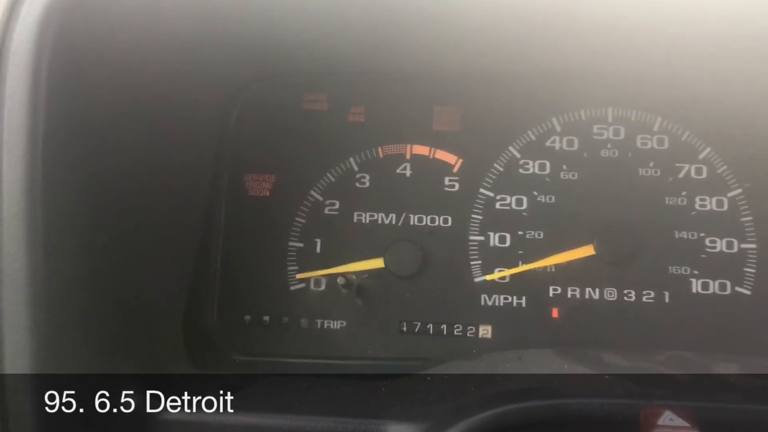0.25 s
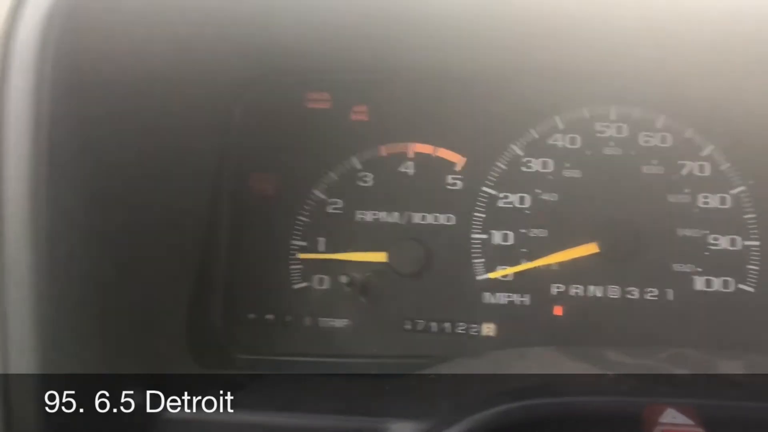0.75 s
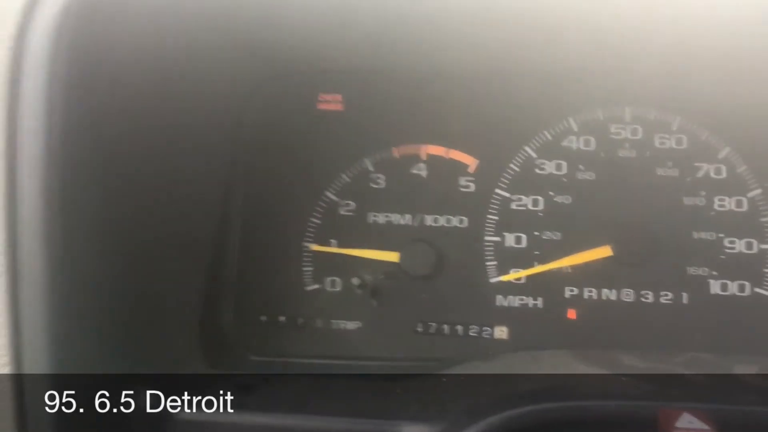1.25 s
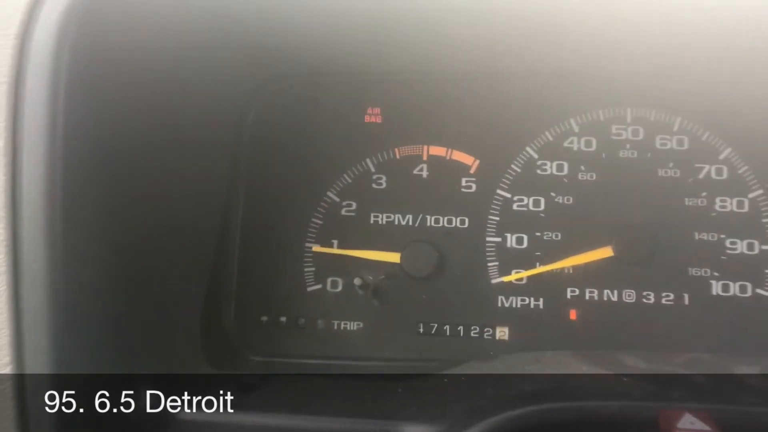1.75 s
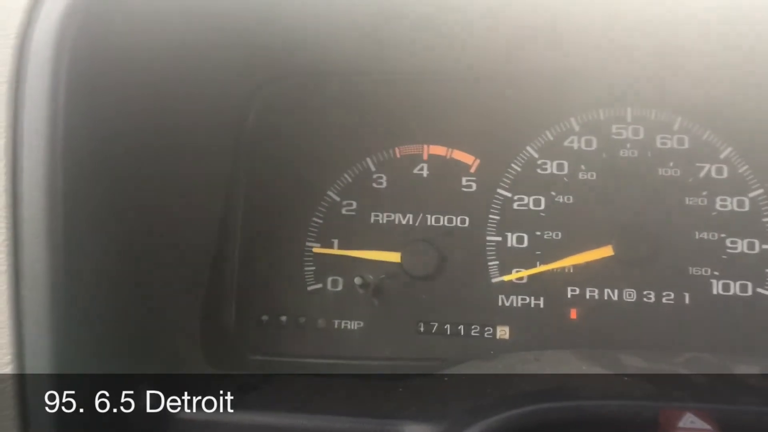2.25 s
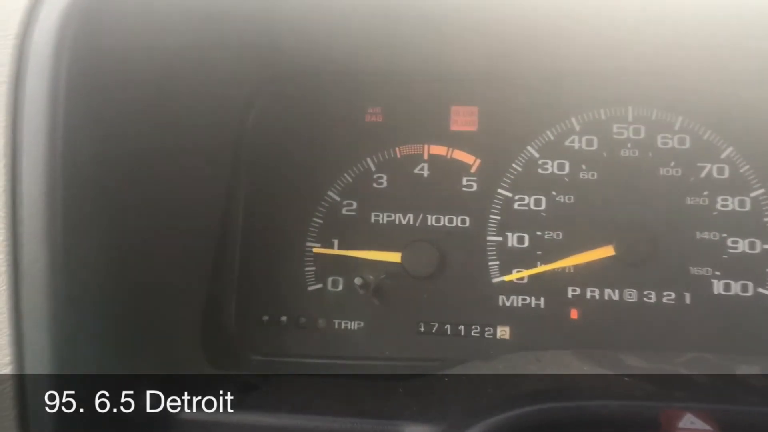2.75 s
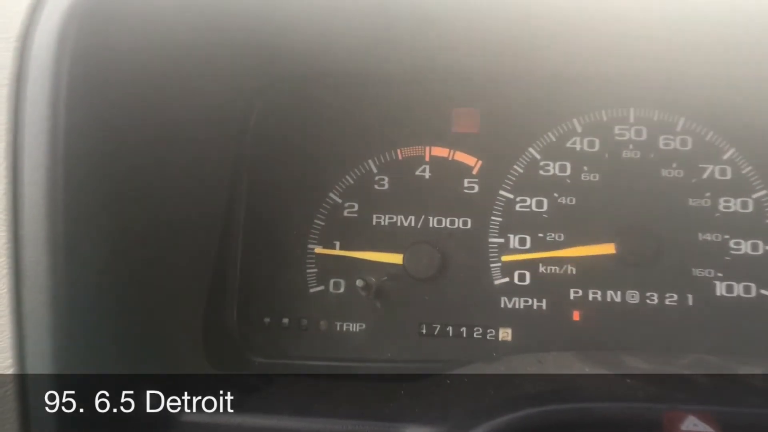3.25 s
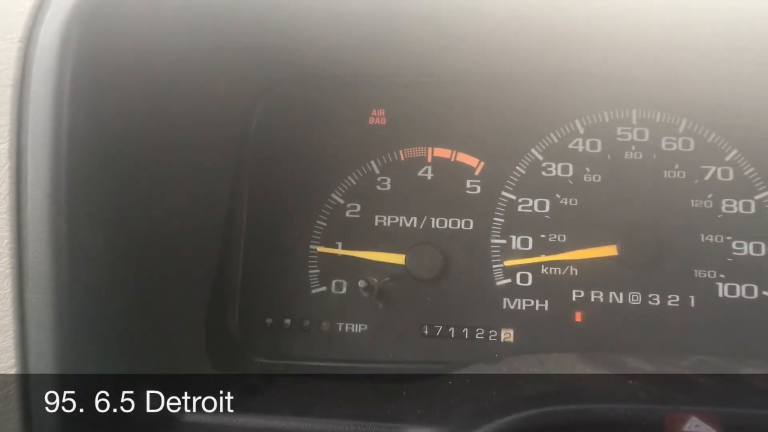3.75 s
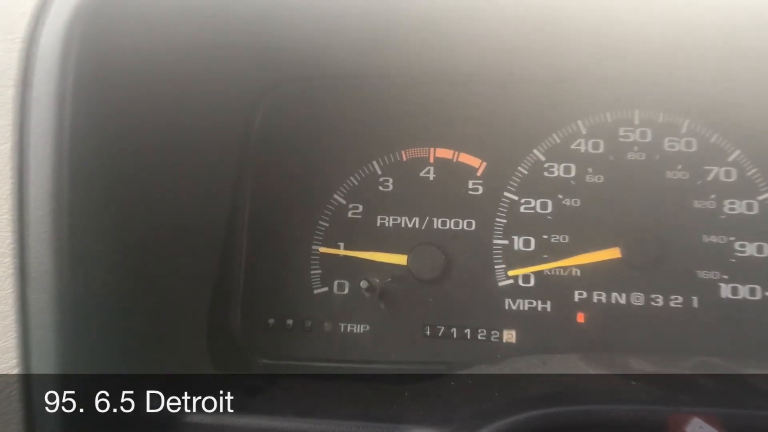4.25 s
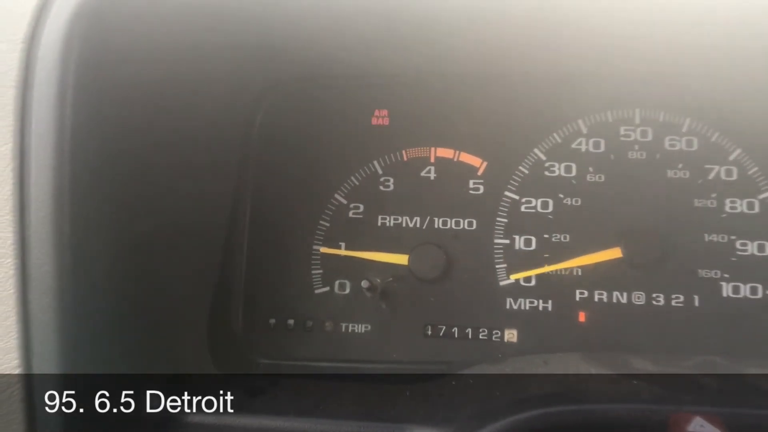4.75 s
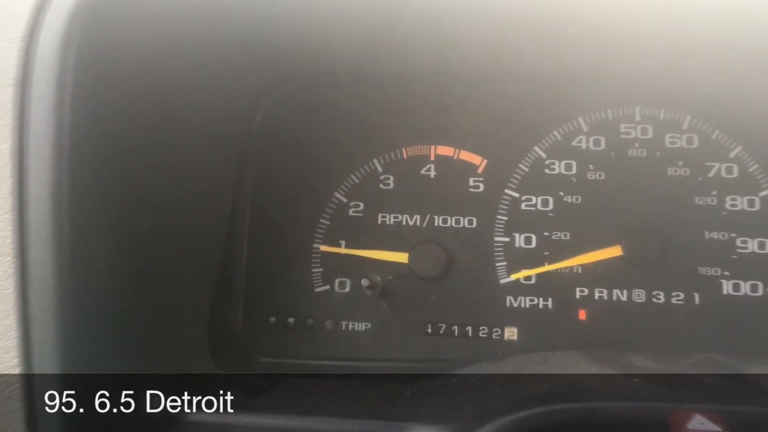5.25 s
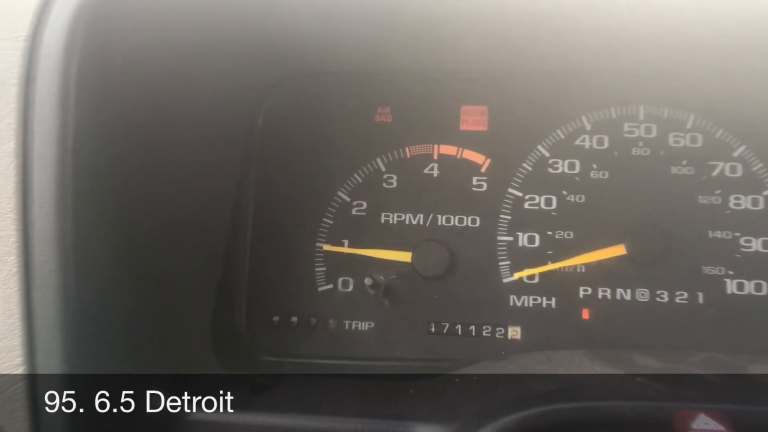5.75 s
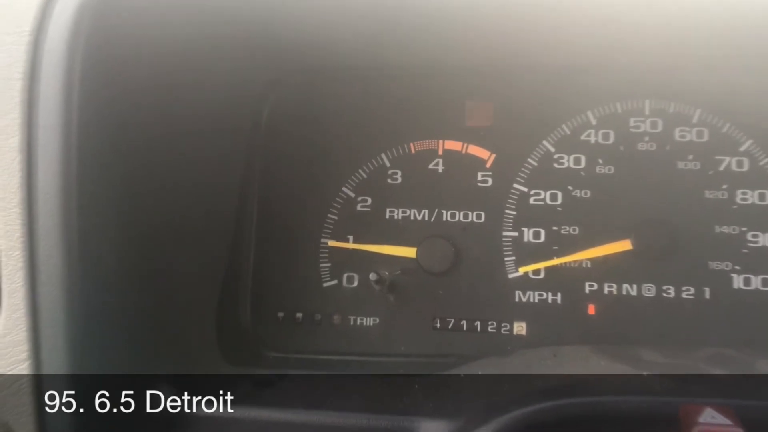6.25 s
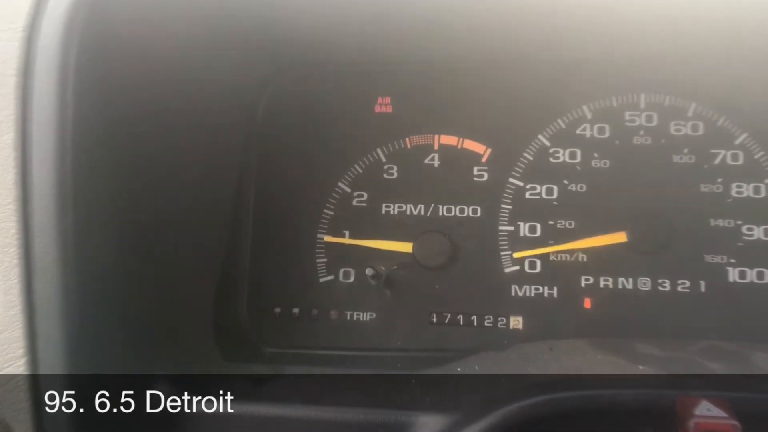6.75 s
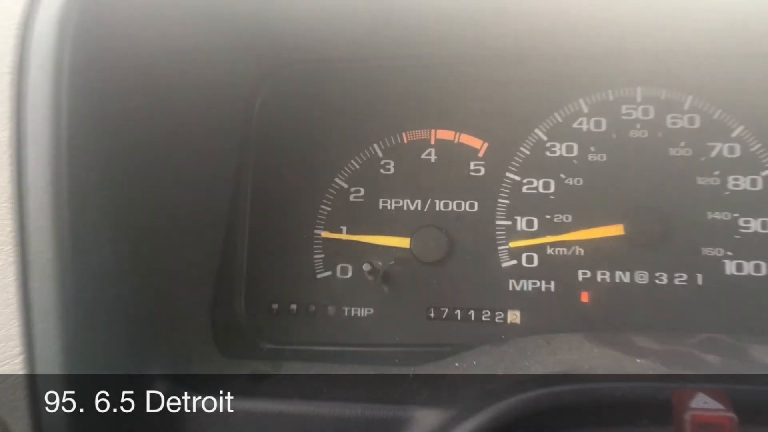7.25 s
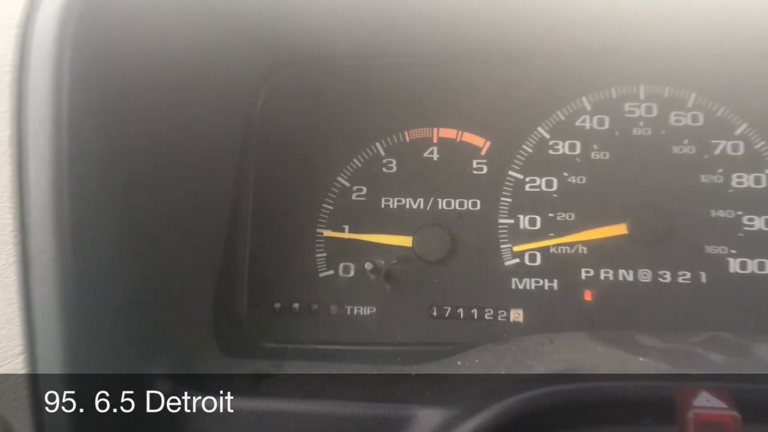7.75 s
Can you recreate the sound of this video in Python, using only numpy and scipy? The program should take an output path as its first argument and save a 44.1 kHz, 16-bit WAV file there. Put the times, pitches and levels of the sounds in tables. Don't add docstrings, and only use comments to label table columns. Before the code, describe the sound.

Heard from the dash inside a truck cab: a starter whirs and its teeth slap, keys tick, and a cold eight-cylinder diesel catches with metallic clanks and quick belt chirps. It stumbles and lopes with a heavy exhaust boom, surges once around three and a half seconds, then settles into a clattering idle muffled by the firewall, with a loose panel rattling and faint hiss.

```python
import sys
import numpy as np
from scipy import signal
from scipy.fft import rfft, irfft
from scipy.io import wavfile
from scipy.ndimage import uniform_filter1d

SR = 44100
rng = np.random.default_rng(int(sys.argv[2]) if len(sys.argv) > 2 else 0)


def digitize_waveform(pressure):
    field = np.atleast_2d(pressure).T
    bounded = np.clip(field, -1, 1)
    quanta = np.round(bounded * 32767).astype(np.int16)
    wavfile.write(sys.argv[1], SR, quanta)


def volts(x):
    e = np.asarray(x, float) / 20
    return 10 ** e


N = 353682
T = np.arange(N) / SR
IDLE_KNOCK_DB = -38.5

# time in seconds, Hz off eleven per engine cycle, level in dB.
BOOM_COURSE = [(0, 15, -21.5), (.2, 4, -31), (.4, -4.5, -21), (.64, 5.5, -14.5), (.8, 1, -16),
               (.95, -2, -14.5), (1.28, -8.5, -11.5), (1.45, -6, -23), (1.65, 1.5, -13.5), (2.05, 6, -17.5),
               (2.55, 1, -13.5), (2.95, 4.5, -15), (3.3, 0, -21), (3.7, 0.5, -23.5), (4.3, 0, -20),
               (6.3, 0, -17), (7.2, 0, -19.5), (8.02, 0, -18.5)]
# centre in seconds, half length in seconds, then the loss in dB
WEAK_FIRINGS = [(.0, 0.065, 29, -1, -1.5), (.2, 0.026, 8, -8, 1), (.33, 0.043, 9, 3, 1.5),
                (.49, 0.027, 21, 0, -2), (.7, 0.076, 16, 3, 0), (.79, 0.031, 6, 15, -3),
                (.96, 0.03, 8, 5, -4.5), (1.07, 0.012, -6, 14, -1.5), (1.19, 0.029, 1, 20, 2),
                (1.37, 0.033, 17, 20, -3), (1.52, 0.03, 19, 15, -3), (1.68, 0.037, 15.5, 10, 1),
                (1.82, 0.09, 2, 4.5, 3), (1.94, 0.085, 13, 5, -1.5), (2.14, .03, -2, -2, 3),
                (2.23, 0.077, 4, 0, 2.5), (2.31, 0.054, 1, 9, 8), (2.4, 0.024, 4, 1.5, -1),
                (2.59, 0.053, 2.5, 17.5, -1), (2.7, 0.034, 0, 0.5, -4), (2.86, 0.028, -2, 7, -3),
                (2.95, 0.031, 9, 21, -2), (3.04, 0.048, 2, -1.5, 0.5)]


def rms_one(x):
    return x / np.sqrt(np.mean(np.abs(x) ** 2) + 1e-20)


def in_time(rows):
    s, *columns = np.transpose(rows)
    return [np.interp(T, s, c) for c in columns]


def bumps(rows):
    s, half, *columns = np.transpose(rows)
    shape = np.exp(-((T - s[:, None]) / half[:, None]) ** 2)
    return [c @ shape for c in columns]


def span(start, end, fade_s):
    return np.clip(np.minimum(T - start, end - T) / fade_s, 0, 1)


def drift(rate):
    r = np.exp(-80 * np.pi * rate / SR)
    slow = signal.lfilter([1], [1, -2 * r, r * r], rng.standard_normal(N // 40 + 2002))[2000:]
    return np.interp(np.arange(N) / 40, np.arange(len(slow)), rms_one(slow))


def band_pass(x, order, low_hz, high_hz):
    return signal.sosfilt(signal.butter(order, [low_hz, high_hz], "band", fs=SR, output="sos"), x)


def resonate(x, hz, width):
    r = np.exp(-np.pi * width / SR)
    poles = [1, -2 * r * np.cos(2 * np.pi * hz / SR), r * r]
    return signal.lfilter([(1 - r * r) / 2, 0, (r * r - 1) / 2], poles, x + 1e-18)


def hum(hz, width):
    return rms_one(resonate(resonate(rng.standard_normal(N), hz, width), hz, width))


def coloured(x, spectrum, low_hz=10, high_hz=20000):
    hz = np.arange(1, N // 2 + 2) * SR / N
    points = np.array(spectrum)
    edges = 1 / (1 + (low_hz / hz) ** 12) / (1 + (hz / high_hz) ** 12)
    db = np.interp(np.log(hz), np.log(points[:, 0]), points[:, 1])
    return irfft(rfft(x) * volts(db) * np.sqrt(edges), N)


def strikes(times, gains):
    out = np.zeros(N)
    np.add.at(out, np.clip((np.asarray(times) * SR).astype(int), 0, N - 1), gains)
    return out


def dying(clicks, rise_s, decay_s):
    fall, rise = np.exp(-1 / (decay_s * SR)), np.exp(-1 / (rise_s * SR))
    decaying = signal.lfilter([1], [1, -fall], clicks + 1e-18)
    return signal.lfilter([1 - rise], [1, -rise], decaying)


def pinged(clicks, hz, width):
    return resonate(resonate(clicks, hz, width), hz, width) * np.e * SR / (2 * np.pi * width)


def starter():
    # time in seconds, level in dB.
    whir_course = [(0, -54), (.2, -59), (.3, -56.5), (.55, -56.5), (.8, -57), (.95, -66), (1.2, -98)]
    # time in seconds, peak in dB.
    tooth_slaps = [(0.011, -41), (0.072, -29), (0.137, -33), (0.206, -37.5), (0.538, -33), (.647, -34),
                   (.736, -32.5)]
    whir = volts(in_time(whir_course)[0]) * rms_one(band_pass(rng.standard_normal(N), 8, 2000, 3800))

    s, db = np.transpose(tooth_slaps)
    slap = dying(strikes(s, volts(db)), 0.0013, 0.004) * rng.standard_normal(N)
    housing = volts(20.0) * resonate(resonate(slap, 750, 600), 750, 600)
    slap = housing + volts(-4.5) * resonate(slap, 1700, 1800) + volts(-33.0) * slap

    centre_s, half_s, song_hz, song_db = .71, .095, 270, -26.5
    swell = np.exp(-((T - centre_s) / half_s) ** 2)
    song = volts(song_db + drift(8.1)) * swell * np.sin(2 * np.pi * song_hz * T)
    return whir + slap + song


def hunting():
    start_s, end_s, rising_s, period_s, swing_hz = 1.3, 3.1, 2.42, .31, 5
    swing = -swing_hz * period_s / (2 * np.pi) * np.cos(2 * np.pi * (T - rising_s) / period_s)
    return swing * span(start_s, end_s, .2)


def shudder():
    shake = band_pass(rng.standard_normal(N), 5, 98, 172)
    return shake / np.sqrt(uniform_filter1d(shake ** 2, size=SR // 10) + 1e-6)


def orders(table, cycle, even, surge, loose, rate):
    out = 0
    for order, db, rough_db, surge_db in table:
        wander = (1 - even * (1 - loose)) * (drift(rate) + 1j * drift(rate)) / np.sqrt(2)
        gain = volts(db + rough_db * (1 - even) + surge_db * surge)
        turning = np.exp(2j * np.pi * (order * cycle + rng.random()))
        out = out + gain * np.real((even + wander) * turning)
    return out


def bass(cycle, boom, even, firing_hz):
    # order of the cycle, level in dB,
    # dB more when rough, dB more at the top of the surge.
    side_orders = [(4, -42, 3, 0), (5, -28, 0, 14), (6, -21, 2, -6), (7, -12, 6, 1), (9, -9, 7, 4),
                   (10, -15, 13, 0), (12, -18, 6, -2), (13, -20, 12, 0)]
    upper_orders = [(13, 0, 0, 4), (14, -1, 0, 0), (15, -2, 0, 1), (16, -.5, 0, -8), (17, -6, 0, -2),
                    (18, -8, 0, 1), (19, 1.5, 0, 2), (20, -5, 0, -5), (21, -8, 0, -7), (22, -10, 0, -8),
                    (23, -11, 0, -6), (24, -8, 0, -3), (25, -14, 0, -4)]
    # centre in seconds, half length in seconds, gain in dB.
    stumbles = [(3.05, 0.21, 6.5), (4.78, 0.17, 6.5), (5.3, 0.11, 3), (5.65, 0.093, 2.5), (6.6, 0.064, 9.5),
                (7.46, 0.082, 0.5)]
    # centre in seconds, half length in seconds, gain in dB.
    jolts = [
        (.15, 0.12, 9),
        (.55, 0.23, -5),
        (1.08, 0.24, 6),
        (1.85, .15, -4.5),
    ]
    idle_hz, surge_hz = 58.75, 5
    firing_level_db, rough_gain_db, db_per_hz = -20.5, 4, 0.68
    sides_db, upper_db = -20.5, -27

    firing_loss, boom_loss, _ = bumps(WEAK_FIRINGS)
    speed_db = db_per_hz * even * (firing_hz - idle_hz)
    firing_db = firing_level_db + rough_gain_db * (1 - even) + speed_db - firing_loss + 1.2 * drift(3)
    boom_db = in_time(BOOM_COURSE)[1] - boom_loss + .7 * drift(8)
    hunt = hunting()
    firing = volts(firing_db) * np.cos(2 * np.pi * (8 * cycle + hunt - .33))
    exhaust = volts(boom_db) * np.cos(2 * np.pi * (boom + .5 * hunt))

    surge = even * np.clip((firing_hz - idle_hz) / surge_hz, 0, 1)
    sides = orders(side_orders, cycle, even, surge, loose=.3, rate=2.5)
    sides = volts(sides_db + bumps(stumbles)[0]) * sides
    upper = rms_one(orders(upper_orders, cycle, even, surge, loose=.5, rate=2.5))
    upper = np.sqrt(even) * upper + np.sqrt(1 - even) * shudder()
    return np.sqrt(2) * (firing + exhaust + sides) + volts(upper_db + bumps(jolts)[0]) * upper


def knock_levels(cycle):
    # time in seconds, knock level in dB, head above block in dB.
    combustion = [(0, -40.5, 5.5), (.15, -41.5, -6.5), (.3, -48, -1), (.55, -40, -2.5), (.8, -40.5, -1),
                  (1.05, -35, -3), (1.5, -38, -1), (2.0, -40, -0.5), (2.3, -37.5, -2.5), (2.75, -44, -3.5),
                  (3.0, -39.5, 0), (3.6, -40, -2), (4.05, -40, 0), (4.56, -43, 0), (5.6, -41, 1),
                  (7.3, -41.5, 3), (7.53, -39.5, 5), (8.02, -37, 2.5)]
    # centre in seconds, half length in seconds, swing in dB.
    surge_throb = [(3.5, .6, 2.5)]
    # centre in seconds, half length in seconds, injector gain in dB.
    hard_knocks = [(.78, .04, 5), (1.3, 0.023, -13), (1.43, 0.025, -7), (1.61, 0.023, 2), (2.49, 0.046, 4),
                   (2.62, .03, 3.5), (4.68, 0.043, -4), (4.87, .04, 4), (6.08, 0.036, 2.5)]
    injector_db, injector_share = -42.5, 0.96

    knock_db, head_db = in_time(combustion)
    knock_db = knock_db - bumps(WEAK_FIRINGS)[2]
    throb_db = bumps(surge_throb)[0] * np.cos(2 * np.pi * (cycle - .48))
    injectors = injector_db + injector_share * (knock_db - IDLE_KNOCK_DB) + throb_db + bumps(hard_knocks)[0]
    return knock_db, knock_db + head_db, injectors


def repeating_noise(cycle, even):
    since = np.arange(N) - np.searchsorted(cycle, np.floor(cycle))
    share = .35 * even
    return np.sqrt(share) * rng.standard_normal(SR)[since] + np.sqrt(1 - share) * rng.standard_normal(N)


def clatter(cycle, even):
    # turn of the cycle 0-1, block in dB, head in dB, injector in dB.
    knocks = np.array([(.08, 2, -10.5, 7.5), (.21, -9, -11.5, -3), (.33, -7, 1.5, 10), (.45, -9.5, -3, -9),
                       (.57, -2, -8, 3.5), (.66, -5.5, 3, -4), (0.821, 3.5, 0.5, 11), (.9, 2.5, -4.5, -1)])
    # low edge in Hz, high edge in Hz, knock decay in seconds,
    # steady share in dB, struck share in dB.
    parts = [
        (300, 726, 0.031, -10.5, -3),
        (700, 1550, 0.076, -2, -16),
        (1480, 4600, 0.016, -12, -14),
    ]
    # frequency in Hz, width in Hz, level in dB.
    metal_rings = [(473, 25, 2), (529, 40, -6), (612, 50, 2), (710, 60, 0), (931, 38, -8), (1081, 38, 3),
                   (1153, 35, -4), (2033, 65, 0), (2271, 30, 1), (2640, 97, -8)]
    # frequency in Hz, dB per Hz.
    firewall = [(200, -27), (290, 9.5), (430, -1), (930, -3.5), (1290, -4.5), (1990, -11), (2600, -16.5),
                (3190, -23.5), (4150, -39), (7000, -82.5)]

    turns = np.arange(int(cycle[-1]) + 1)[:, None] + knocks[:, 0]
    times = np.interp(turns, cycle, T, right=0) + rng.normal(0, 0.001176, turns.shape)
    alike = np.interp(times, T, even)
    luck = rng.standard_normal((4,) + turns.shape)
    out = 0
    for k, (level_db, part) in enumerate(zip(knock_levels(cycle), parts)):
        low_hz, high_hz, decay_s, steady_db, struck_db = part
        gain_db = alike * knocks[:, k + 1] + 1.3 * luck[0] + 1.3 * luck[k + 1]
        gains = volts(gain_db) * (times > .002)
        clicks = strikes(times.ravel(), gains.ravel())
        envelope = dying(clicks, 0.01, decay_s) + volts(steady_db + drift(5.1))
        burst = envelope * repeating_noise(cycle, even)
        drive = rms_one(burst) + volts(struck_db) * even * rms_one(clicks)
        rung = drive
        for hz, width, db in metal_rings:
            if low_hz < hz < high_hz:
                rung = rung + volts(db) * resonate(drive, hz, width)
        out = out + volts(level_db) * rms_one(coloured(rung, firewall, low_hz, high_hz))
    return out


def cab_panels():
    # frequency in Hz, width in Hz, level in dB.
    panel_hums = [(198, 44, -47.5), (230.3, 38, -43.5), (273.7, 13, -47), (329.8, 46, -52)]
    return sum(volts(db + 0.5 * drift(6.5)) * hum(hz, width) for hz, width, db in panel_hums)


def hiss(cycle):
    # frequency in Hz, dB per Hz.
    air_colour = [(2500, -13), (3500, -1.5), (4800, -5), (6500, 2.5), (7400, -4), (8800, -0.5),
                  (10300, -10), (11500, -7), (14000, -10.5), (16000, -11.5)]
    # centre in seconds, half length in seconds, gain in dB.
    lulls = [(.35, 0.21, -4.5), (8.05, 0.33, -5)]
    # time in seconds, level in dB.
    cold_air = [(0, -79), (.88, -80), (.97, -70.5), (3, -69), (6, -83), (8.02, -81)]
    # frequency in Hz, width in Hz, level in dB.
    whistle_bands = [(6120, 150, 1.5), (6590, 120, 2), (6850, 120, -0.5), (8930, 300, -2.5),
                     (11400, 200, -4.5), (11820, 200, -3.5), (13600, 140, -12.5)]
    # start in seconds, end in seconds, level in dB.
    whistle_spells = [
        (1.4, 2.752, -68),
        (3.842, 5.802, -68),
        (6.85, 7.612, -69),
    ]

    air_db = -63 + bumps(lulls)[0] + 1.7 * np.cos(16 * np.pi * cycle) + 1.2 * drift(11.0)
    air = volts(air_db) * rms_one(coloured(rng.standard_normal(N), air_colour))
    cold = rms_one(coloured(rng.standard_normal(N), air_colour, low_hz=11000))
    cold = volts(in_time(cold_air)[0]) * cold
    on = sum(volts(db) * span(start, end, 0.3) for start, end, db in whistle_spells)
    whistle = rms_one(sum(volts(db) * hum(hz, width) for hz, width, db in whistle_bands))
    pulse = volts(7 * np.cos(2 * np.pi * 38.1 * T) - 3.0)
    return air + on * whistle * pulse + cold


def chirps_and_clanks():
    # time in seconds, peak in dB, frequency in Hz.
    clanks = [(.072, -30, 700), (.1, -32, 700), (.137, -32, 667), (.165, -36, 690), (1.232, -24.5, 1147),
              (1.362, -27, 1110), (1.013, -28, 654), (1.051, -31, 641), (1.095, -21.5, 670),
              (1.239, -24, 630), (1.307, -40, 662), (1.438, -35, 584), (1.58, -32, 619)]
    belt_chirps = [(0.8691, -32, 1530), (0.9258, -24.5, 1440), (0.9544, -32, 1550), (1.0222, -28, 1410),
                   (1.105, -24.5, 1490), (1.1468, -38, 1580), (1.1807, -24.5, 1505), (1.434, -30, 1535),
                   (1.4677, -33, 1520), (1.5294, -32, 1480), (1.579, -28, 1540), (1.7476, -29, 1460),
                   (1.8523, -35, 1520), (1.9287, -35, 1500), (1.9586, -33, 1500), (1.999, -26, 1480),
                   (2.0522, -29, 1390)]
    events = list(clanks) + list(belt_chirps)
    return sum(pinged(strikes([s - .002], volts(db - 2.5)), hz, 75) for s, db, hz in events)


def dash():
    # centre in seconds, half length in seconds, peak in dB.
    dash_rings = [(0.54, 0.054, -33.5), (1.041, 0.053, -31), (1.398, 0.045, -37), (1.52, 0.067, -34),
                  (1.656, 0.023, -32.5), (1.8, 0.057, -34.5), (2.071, 0.032, -32), (2.217, 0.032, -34.5),
                  (2.536, 0.047, -36.5)]
    s, half, db = np.transpose(dash_rings)
    swell = volts(db) @ np.exp(-((T - s[:, None]) / half[:, None]) ** 2)
    return swell * np.sin(2 * np.pi * (271 * T + .15 * drift(4)))


def keys():
    # time in seconds, peak in dB, ring in dB.
    ticks = [(0.592, -59.5, 4), (0.638, -26.5, 1.5), (0.6538, -45.5, 0), (0.736, -42, -8),
             (0.7474, -30.5, -4), (0.9790, -43.5, -15), (1.037, -50, -13), (1.256, -36, -10),
             (1.262, -43, -14)]
    # frequency in Hz, level in dB, time to fall 60 dB in seconds.
    metal_modes = [(4740, -20.5, 0.041), (6240, -3.5, 0.039), (6900, -2, 0.019), (8220, -10.5, 0.023),
                   (8900, -18.5, 0.02), (12130, -22, 0.064), (14340, -37, 0.041)]
    s, db, ring_db = np.transpose(ticks)
    grit = rng.standard_normal(N)
    crack = dying(strikes(s, volts(db)), 0.00069, 0.003) * grit
    jingle = dying(strikes(s, volts(db + ring_db)), 0.00069, 0.003) * grit
    rings = sum(volts(mode_db + 10.5) * resonate(jingle, hz, 2.4 / t60) for hz, mode_db, t60 in metal_modes)
    return rings + volts(-12.0) * band_pass(crack, 2, 3500, 15000)


def whines():
    # start in seconds, end in seconds, frequency in Hz, width in Hz, level in dB.
    whine_lines = [(0.93, 1.5, 223, 11, -42), (1.3, 7.4, 1751, 20, -54), (1.301, 1.9, 1515, 200, -44),
                   (1.2, 7.7, 1529, 21, -53), (0.735, 0.837, 1860, 86, -37.5), (0.96, 1.1, 5200, 2500, -60),
                   (.73, .83, 2500, 1100, -47.5), (.76, 0.91, 5800, 900, -64.5)]
    return sum(volts(db) * span(start, end, 0.028) * hum(hz, width) for start, end, hz, width, db in whine_lines)


def cylinder_rings(cycle, even):
    # turn of the cycle, frequency in Hz, width in Hz, peak in dB when warm, dB more while cold.
    ring_pattern = [(.21, 527, 60, -41, -5), (.555, 529, 45, -33, -1), (.725, 529, 45, -37, -2),
                    (.845, 529, 45, -37, -4), (.355, 931, 50, -39, 2), (.48, 935, 60, -40, 1),
                    (.625, 929, 45, -33, -4), (.98, 931, 60, -43, -4), (.32, 1153, 70, -39, -3),
                    (.535, 1150, 60, -38, 2), (.66, 1160, 70, -38, -3), (.81, 1153, 60, -36, -6),
                    (.0, 271, 30, -42, -1), (.57, 273, 30, -43, 3), (.85, 270, 30, -41, -3),
                    (.56, 680, 90, -43, 0), (.42, 2033, 90, -46, 3), (.7, 2040, 90, -46, 0),
                    (.42, 2271, 80, -49, 3), (.31, 2640, 400, -46, -1), (.74, 2500, 400, -48, -3)]
    ring_lag = [(0, .17), (17, .17), (19, .13), (22, -.01), (26, -.03), (30, .01), (60, 0)]
    warming_s = [4.7, 5.2]

    whole = np.arange(6, int(cycle[-1]) + 1)
    head_db = knock_levels(cycle)[1] - IDLE_KNOCK_DB
    out = 0
    for turn, hz, width, db, cold_db in ring_pattern:
        luck = rng.standard_normal((2, len(whole)))
        lag = np.interp(whole + turn, *np.transpose(ring_lag))
        s = np.interp(whole + turn + lag, cycle, T)
        loose = 1 - .8 * np.interp(s, T, even)
        cold = np.interp(s, warming_s, [1, 0])
        level_db = db - 1 + cold_db * cold + np.interp(s, T, head_db) + 4 * loose * luck[0]
        out = out + pinged(strikes(s + .003 * loose * luck[1], volts(level_db)), hz, width)
    return out


def rattle(cycle):
    # time in seconds, level in dB.
    panel_course = [(1.2, -79.5), (2.9, -78.5), (3.5, -73), (4.5, -76.5), (6, -74), (8.02, -72.5)]
    # time in seconds, peak in dB.
    hit_course = [(1.2, -51), (1.45, -62.5), (2.25, -64.5), (2.6, -46), (2.85, -68), (3.05, -51),
                  (3.5, -46), (4.05, -53), (4.33, -55), (4.46, -65), (4.6, -56), (4.73, -62), (4.87, -51),
                  (5.14, -54), (5.27, -62.5), (5.42, -51), (5.9, -57), (6.1, -52.5), (6.4, -56),
                  (8.02, -57)]
    # cycle, lag in seconds.
    hit_lag = [(8, .012), (17, .012), (21, 0)]
    first_cycle, end_cycle, hit_turn, scatter_turns = 8, 58, .335, .012

    turns = np.arange(first_cycle, end_cycle) + hit_turn
    luck = rng.standard_normal((len(turns), 2))
    s = np.interp(turns + scatter_turns * luck[:, 0], cycle, T) + np.interp(turns, *np.transpose(hit_lag))
    db = np.interp(s, *np.transpose(hit_course)) + 1.8 * luck[:, 1]
    shake = dying(strikes(s, volts(db)), 0.008, 0.011) * rng.standard_normal(N)
    wide = band_pass(shake, 2, 3000, 9500)
    gate_db = 6 * np.tanh(2 * np.cos(2 * np.pi * (cycle - .65)) + 1) - 3
    ring = volts(in_time(panel_course)[0] + gate_db + 1.5 * drift(15)) * hum(4540, 510)
    return volts(8.0) * resonate(shake, 4500, 770) + volts(-4.0) * wide + ring


def scene():
    # time in seconds, firings per second.
    speed_course = [(0.0, 46.65), (0.35, 49.67), (0.9, 55.36), (1.8, 56.1), (2.4, 54.17), (2.96, 54.17),
                    (3.36, 62.39), (3.66, 66.15), (3.96, 62.16), (4.26, 62.18), (4.56, 58.25),
                    (4.86, 59.39), (5.16, 60.32), (5.46, 57.49), (6.36, 58.2), (6.66, 58.01), (7.1, 58.97),
                    (8.02, 57.34)]
    # time in seconds, how alike the cycles are 0-1, throb in dB as one bank fires harder,
    # turn of the cycle at which the throb peaks.
    running = [(0, .1, .1, .62), (.8, .15, 1, .62), (1.3, .2, 3.2, .64), (2.0, .25, 3.5, .72),
               (2.7, .35, 3.5, .7), (3.05, .9, 3.8, .55), (4.1, .95, 3.6, .55), (4.6, .97, 2.6, .62),
               (8.02, .97, 2.6, .62)]

    firing_hz, = in_time(speed_course)
    cycle = np.cumsum(firing_hz) / SR / 8
    slip = np.cumsum(in_time(BOOM_COURSE)[0]) / SR
    boom = 11 * cycle + slip - slip[-1] - .5
    even, throb_db, throb_turn = in_time(running)
    even = np.clip(even, 0, 1)
    throb = volts(throb_db * np.cos(2 * np.pi * (cycle - throb_turn)))

    engine = starter() + bass(cycle, boom, even, firing_hz) + throb * clatter(cycle, even)
    engine = engine + chirps_and_clanks() + whines() + cylinder_rings(cycle, even)
    cab = cab_panels() + hiss(cycle) + dash() + keys() + rattle(cycle)
    return (engine + cab)[None]


def low_pass(x):
    return signal.sosfilt(signal.butter(12, 15720, fs=SR, output="sos"), x)


def record(dry):
    mix = signal.sosfilt(signal.butter(2, 25, "high", fs=SR, output="sos"), dry)
    return low_pass(mix)


dry = scene()
out = record(dry)
digitize_waveform(out)
```